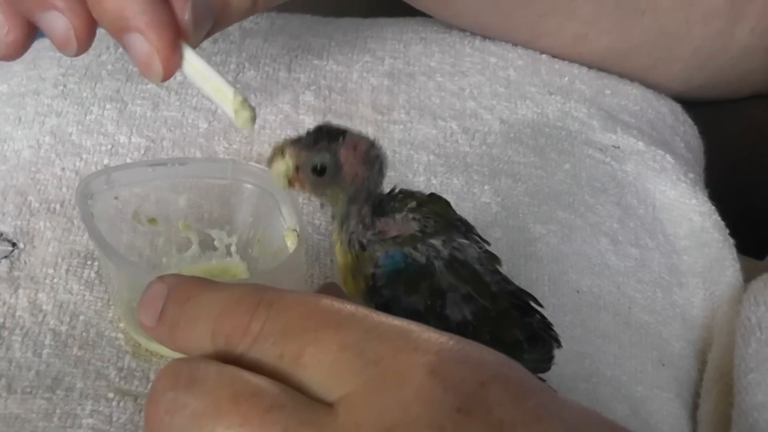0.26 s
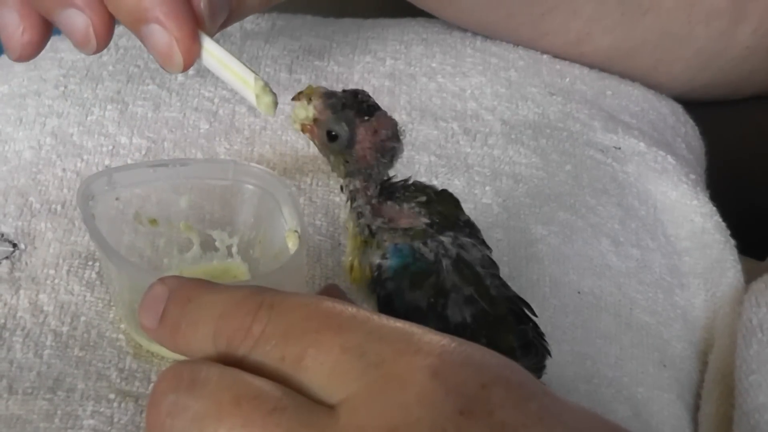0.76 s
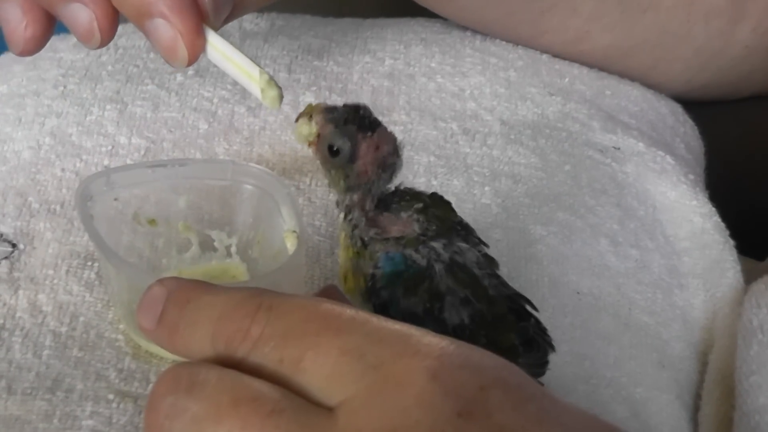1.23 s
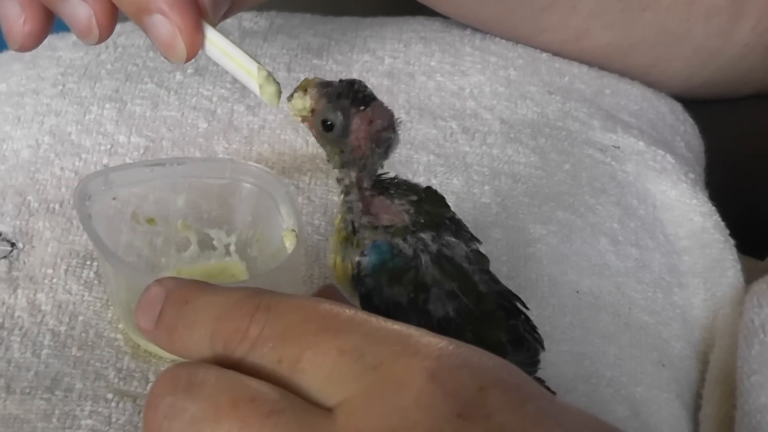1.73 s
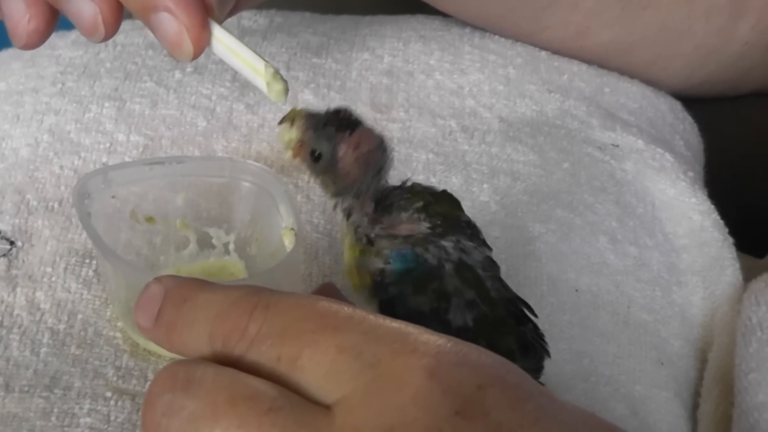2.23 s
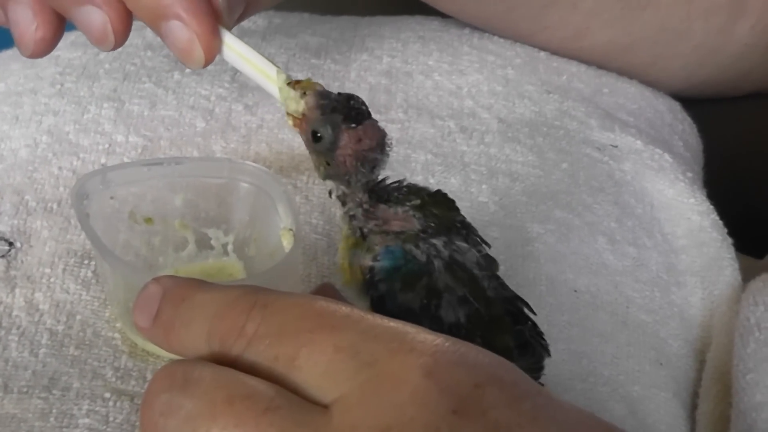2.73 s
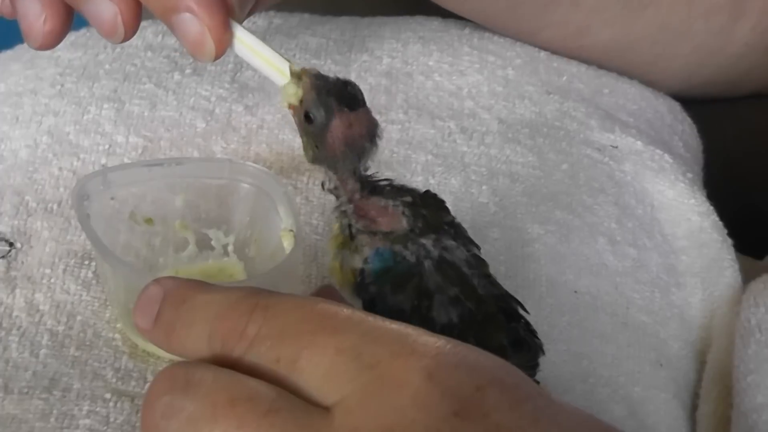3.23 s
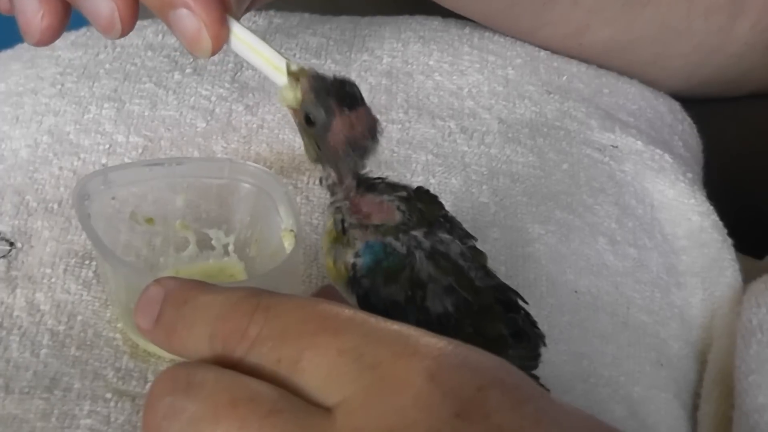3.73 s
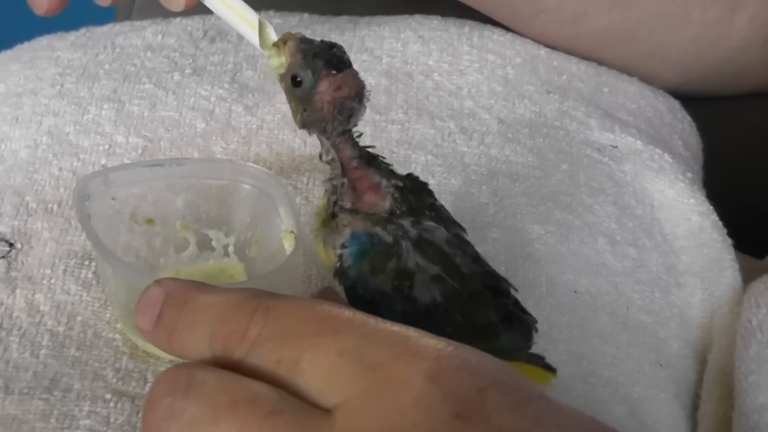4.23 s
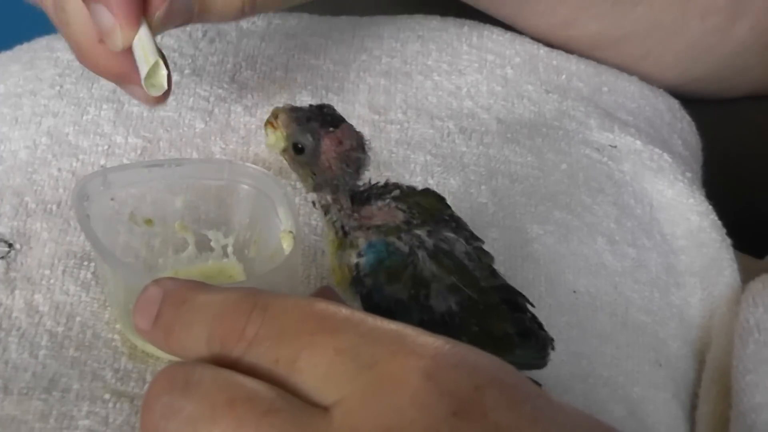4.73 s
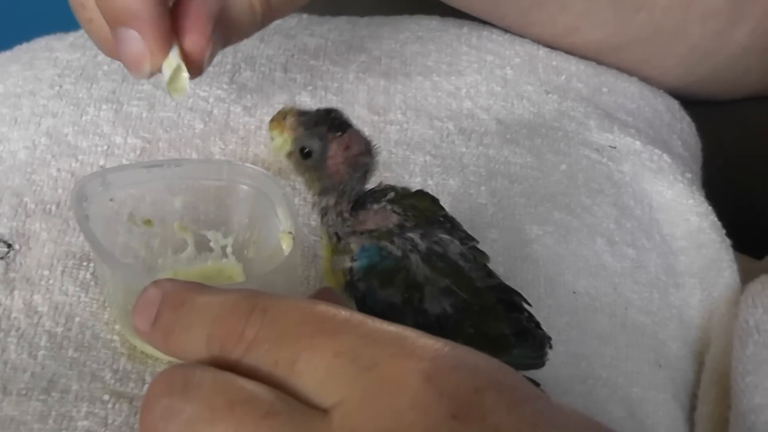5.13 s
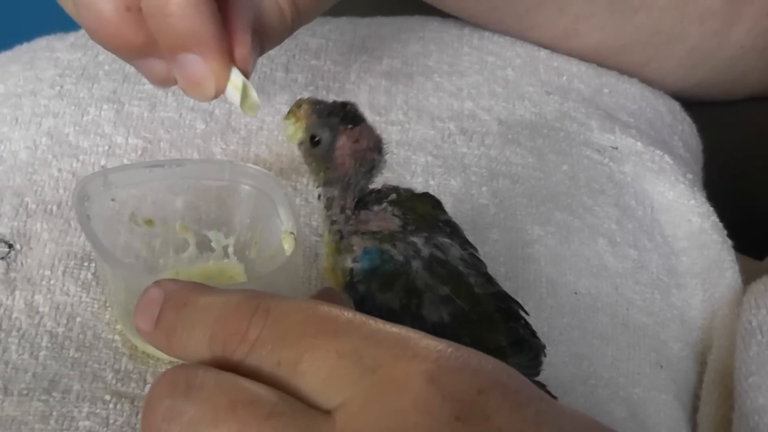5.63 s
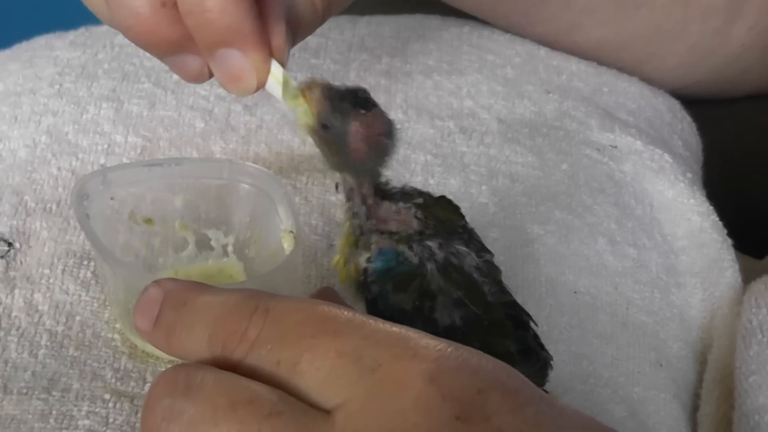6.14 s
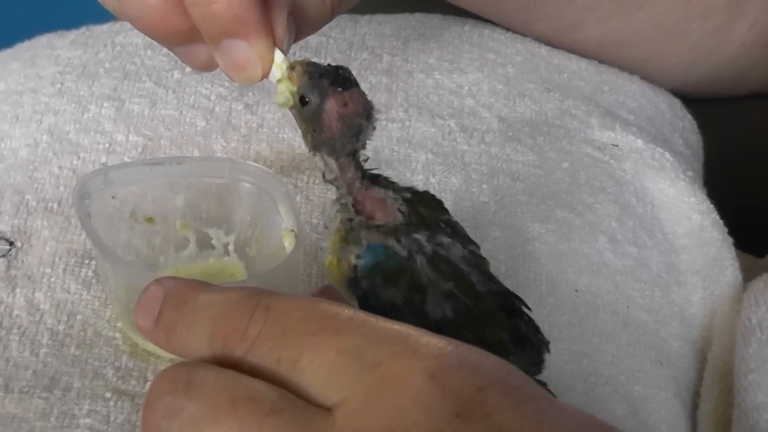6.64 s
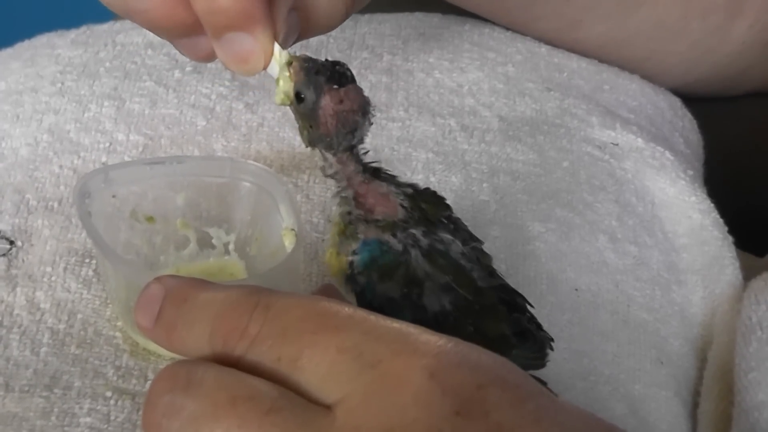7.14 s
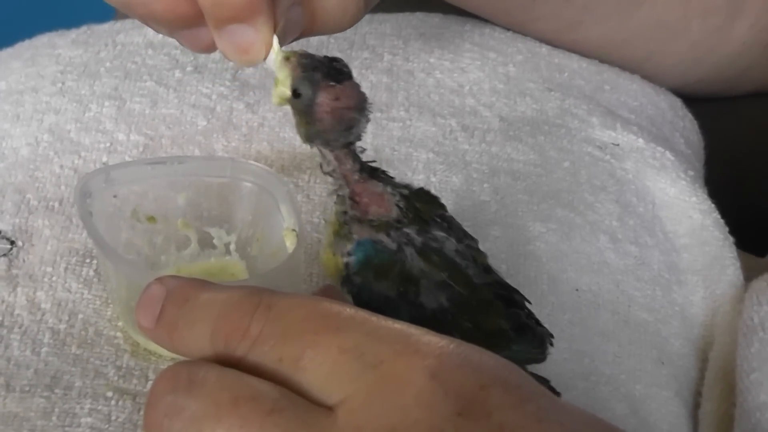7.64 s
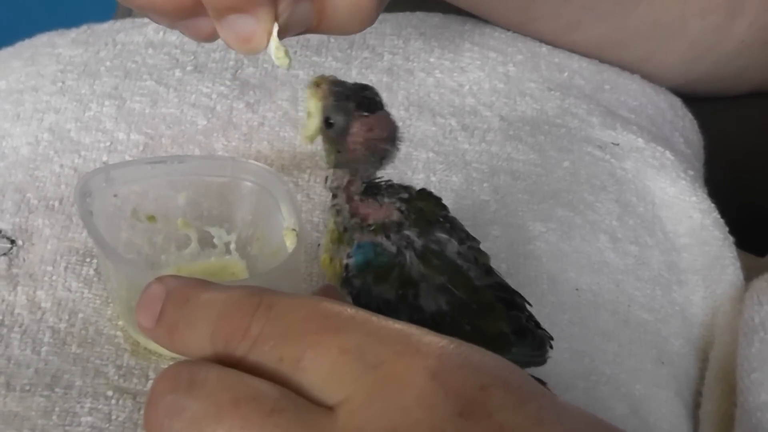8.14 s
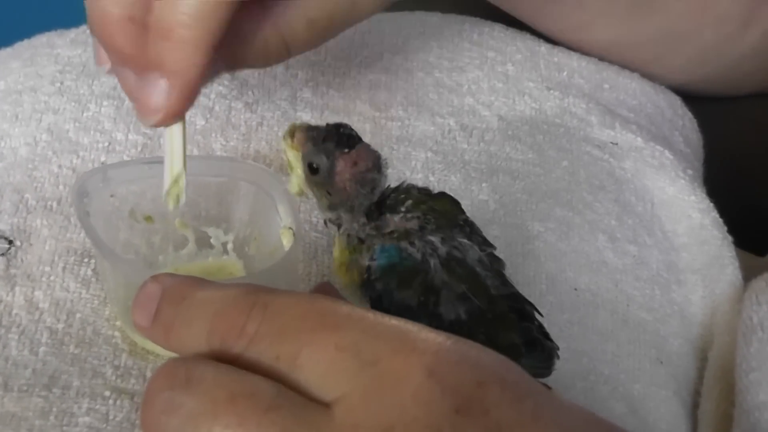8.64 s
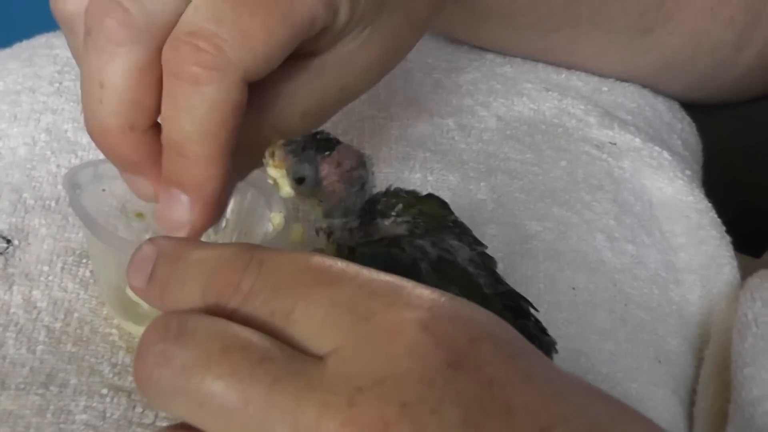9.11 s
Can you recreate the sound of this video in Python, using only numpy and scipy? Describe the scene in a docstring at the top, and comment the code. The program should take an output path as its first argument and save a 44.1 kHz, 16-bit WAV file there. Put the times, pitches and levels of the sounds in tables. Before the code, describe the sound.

A baby parrot gives short, sharp, high begging chirps in runs with pauses, close by in a small room.

```python
"""Far traffic hums outside; then, close by, a parrot chick begs while it is fed from a plastic spoon.
Each chirp starts with a rasp from slack membranes in its voice box, then whistles up to a crest,
dips and climbs again, and the small hard-walled room rings on.
Beak and spoon tick softly, and near the end comes a soft, grainy, breath-like hiss."""
import sys
import numpy as np
from scipy import signal
from scipy.fft import rfft, irfft, next_fast_len
from scipy.io import wavfile
from scipy.ndimage import uniform_filter1d

SR = 44100
rng = np.random.default_rng(int(sys.argv[2]) if len(sys.argv) > 2 else 0)


def put_to_file(sound):
    """Save the sound as 16-bit audio at rate SR, in the file named by the first command-line argument."""
    columns = np.atleast_2d(sound).T  # one column per channel
    safe = np.clip(columns, -1, 1)
    whole_steps = np.round(safe * 32767)
    wavfile.write(sys.argv[1], SR, whole_steps.astype(np.int16))


N = 413216
TIME = np.arange(N) / SR


def from_db(db):
    """Turn decibels into a number to multiply by."""
    return 10 ** (np.asarray(db) / 20)


def rms_one(x):
    """Scale a signal so its average strength (rms) is 1."""
    return x / np.sqrt(np.mean(x ** 2) + 1e-20)


def at_hz(points, size=N):
    """Join rows of (Hz, value) into a curve over all frequencies."""
    hz, value = np.transpose(points)
    return np.interp(np.log(np.fft.rfftfreq(size, 1 / SR) + 1), np.log(hz), value)


def noise(colour):
    """Noise of strength 1; its colour says how strong each frequency is."""
    return rms_one(irfft(rfft(rng.standard_normal(N)) * from_db(at_hz(colour)), N))


def drift(rate_hz):
    """A random wander of strength 1, mostly slower than the given rate."""
    hz = np.fft.rfftfreq(N, 1 / SR)
    return rms_one(irfft(rfft(rng.standard_normal(N)) / (1 + (hz / rate_hz) ** 2), N))


def hump(t, width_s):
    """A smooth swell: 1 at t = 0, about a third one width either side."""
    return np.exp(-(t / width_s) ** 2)


# Each row: frequency in Hz, relative level of the background noise in dB.
AIR_COLOUR = [(18, -40.5), (30, -17), (90, -10), (160, -7), (243, -6.5), (389, -12), (673, -10), (728, -10),
              (830, -11.5), (1680, -15.5), (2690, -28.5), (3980, -26.5), (4660, -28.5), (6720, -35),
              (15500, -50)]
# Each row: frequency in Hz, how alike left and right are (1 means the same).
AIR_LIKENESS = [(40, 0.66), (90, 0.29), (180, 0.24), (350, 0.28), (700, 0.67), (1400, 0.093), (3000, 0.85),
                (12000, 0.89)]
# Each row: frequency in Hz, how much louder the left is than the right in dB.
AIR_LEFT_DB = [(40, -5), (180, -1.1), (700, -1.5), (1400, 0), (12000, 0.5)]
# Each row: time in seconds, traffic level in dB (only its rise and fall count).
TRAFFIC_SWELL = [(0.0, -54), (1.72, -56), (2.11, -53.5), (2.66, -58), (3.91, -57.5), (4.46, -59.5),
                 (5.51, -57.5), (6.5, -57.5), (7.12, -53), (8.61, -58), (8.9, -55), (9.37, -57.5)]

def traffic(level_db=-51.5, rumble_follow=.45):
    """Traffic through the walls: rumble and tyre wash swell over a steady hiss."""
    swell_db = np.interp(TIME, *np.transpose(TRAFFIC_SWELL))
    swell_db -= swell_db.mean()
    alike = at_hz(AIR_LIKENESS)
    mid, side = rfft(rng.standard_normal((2, N)))
    sides = np.array([[1], [-1]])   # left, right
    air = np.sqrt(1 + alike) * mid + sides * np.sqrt(1 - alike) * side
    air *= from_db(at_hz(AIR_COLOUR) + sides * at_hz(AIR_LEFT_DB) / 2)
    low, high = at_hz([(300, 1), (500, 0)]), at_hz([(1200, 0), (4000, 1)])
    rumble, wash, hiss = (irfft(air * share, N) for share in (low, 1 - low - high, high))
    swelling = rumble * from_db(rumble_follow * swell_db) + wash * from_db(swell_db) + hiss
    return from_db(level_db) * swelling / np.std(rumble + wash + hiss)


# An idling engine slows a little. Each row: time in seconds, firings per second.
IDLE_SPEED = [(0, 47.83), (6.6, 47.1), (9.37, 45.35)]
# Levels in dB of its tones at one, two and three times the firing rate.
IDLE_TONES_DB = [-69.5, -66, -71.5]
# A steady hum. Each row: pitch in Hz, level in dB.
HUM_TONES = [(187, -67), (235, -65.5)]
# Low drones. Each row: time of the peak in seconds, width in seconds, pitch in Hz, level in dB.
DRONE_SWELLS = [(2.68, 0.66, 58.2, -54.5), (4.45, 0.61, 55.9, -61), (5.458, .75, 139.3, -61),
                (8.104, 0.37, 86.55, -54.5), (8.901, .8, 45.4, -60.5), (9.3, .25, 89, -60)]

def engines(waver=.012, flutter_db=2.0):
    """Low wavering tones of far motors: one idles, one hums, others swell and fade."""
    def tone(hz, level_db):
        gain = from_db(level_db + flutter_db * drift(4.3))
        phase = 2 * np.pi * np.cumsum(hz * (1 + waver * drift(6))) / SR
        return gain * np.sqrt(2) * np.sin(phase)
    firing_hz = np.interp(TIME, *np.transpose(IDLE_SPEED))
    idle = sum(tone(k * firing_hz, db) for k, db in enumerate(IDLE_TONES_DB, 1))
    hum = sum(tone(hz, db) for hz, db in HUM_TONES)
    drones = sum(tone(hz, db) * hump(TIME - at, width_s) for at, width_s, hz, db in DRONE_SWELLS)
    return (idle + hum + drones) * from_db([[-1.5], [1.2]])   # louder on the right


LOWEST_HZ, RASP_HZ, DIP_HZ, SECOND_CREST_HZ = 4082, 4640, 5268, 5950

def chirp_pitch(t, rise_s, second_s, crest_hz, curve=1.8, drop_s=.0155, upturn_s=.022):
    """The pitch climbs to the crest at t = 0, dips, and turns up once more."""
    climb = crest_hz - (crest_hz - RASP_HZ) * np.abs(t / rise_s) ** curve
    drop = (crest_hz - DIP_HZ) * hump(t, drop_s)
    upturn = (SECOND_CREST_HZ - DIP_HZ) * hump(t - second_s, upturn_s)
    return np.where(t < 0, np.maximum(climb, LOWEST_HZ), DIP_HZ + drop + upturn)


def voicing_db(t, on_s, off_s, attack_db_per_s=1004.5, release_db_per_s=802.5):
    """The voice fades in, holds from on_s to off_s, then fades out."""
    return -attack_db_per_s * np.maximum(on_s - t, 0) - release_db_per_s * np.maximum(t - off_s, 0)


def rasp_shape(t, hold_s=.005, build_db_per_s=754, fade_db_per_s=950.5, creak_hz=248, depth=.6):
    """Creaky pulses build up to the rasp, which holds around t = 0 and dies away."""
    before = np.maximum(-t - hold_s, 0)
    creak = 1 + depth * np.sin(2 * np.pi * creak_hz * before)
    return creak * from_db(voicing_db(t, -hold_s, hold_s, build_db_per_s, fade_db_per_s))


# Each row: frequency in Hz, relative level of the rasp in dB.
RASP_COLOUR = [(700, -34), (1200, -15), (1700, -6.5), (2280, -20.5), (3100, -13), (3650, -15), (4600, -15),
               (5500, -10.5), (6850, 2.5), (8100, -7), (9300, -14), (12400, -20.5), (15500, -33)]

def rasp(crackle_db=5.0):
    """Slack membranes rattle, making a crackly noise."""
    return noise(RASP_COLOUR) * rms_one(from_db(crackle_db * drift(450)))


# Each row: frequency in Hz, relative level of the breath in dB.
BREATH_COLOUR = [(1500, -21), (2900, -13), (3600, -13.5), (4700, -7), (6600, 8), (7300, 2), (8000, 1.5),
                 (9100, -3), (10000, -1.5), (12000, -3), (13300, -27.5), (15500, -23.5)]

def husky_edge(phase, breath_db=-1.5, flutter_db=9):
    """Strained membranes add breathy, unsteady tones at 0.5 and 1.5 times the pitch."""
    half_phase = phase / 2 + 1.3 * drift(240)
    half_tones = np.sin(phase + half_phase) + 0.27 * np.sin(half_phase)
    patches = rms_one(from_db(flutter_db * np.tanh(drift(60) - .5)))   # catches and lets go
    return (from_db(breath_db) * noise(BREATH_COLOUR) + half_tones) * patches


# Each row: time of the crest in seconds; seconds from rasp to crest, from first push of air to crest
# and from crest to second crest; crest pitch in Hz; whistle level in dB in the dip, at the crest and
# at the second crest; level in dB of the octave (a tone at twice the pitch) and of the rasp.
CHIRP_NOTES = [ (0.481, 0.042, 0.021, 0.066, 6093, -30.5, -20.5, -28.5, -37, -38.5),
               (0.798, 0.037, 0.012, 0.094, 6100, -29.5, -22, -25.5, -36.5, -39.5),
               (1.713, .042, .015, 0.093, 6060, -25.5, -11.5, -19, -36, -35),
               (2.014, 0.048, 0.025, 0.1, 6110, -26.5, -19, -21.5, -33.5, -34.5),
               (2.333, 0.046, 0.023, 0.091, 6170, -27.5, -21.5, -20, -38.5, -34.5),
               (2.671, 0.036, 0.017, 0.098, 6100, -29, -19.5, -20.5, -36, -36.5),
               (2.963, 0.046, 0.011, .089, 6225, -28.5, -15, -24.5, -49, -37),
               (3.314, 0.042, 0.013, 0.085, 6205, -29.5, -20.5, -28, -53.5, -43.5),
               (4.274, .036, 0.01, .083, 6150, -28, -13, -20.5, -52.5, -51),
               (5.68, 0.041, .027, 0.079, 6226, -23.5, -16, -17, -39.5, -37.5),
               (6.006, 0.045, 0.022, 0.092, 6034, -27.5, -12, -28.5, -37.5, -35),
               (6.316, .044, 0.015, .095, 6174, -25.5, -11, -20, -46, -39.5),
               (6.642, 0.048, 0.013, 0.08, 6175, -31, -30, -46.5, -47.5, -43),
               (8.470, 0.034, 0.016, 0.061, 6170, -25.5, -10.5, -42, -54, -35.5)]

def chirps(climb_db=-30.5, loss_db_per_khz=5.5, octave_fade_db_per_s=90, lead_in_db=-55, creak_s=.023):
    """Pitch and strengths of the voice: each chirp is a creak, then a note with two pushes of air."""
    pitch, gains = np.full(N, float(DIP_HZ)), np.zeros((4, N))
    for at, rise_s, push_s, second_s, crest_hz, *levels in CHIRP_NOTES:
        dip_db, crest_db, second_db, octave_db, rasp_db = levels
        i = np.arange(int((at - .1) * SR), int((at + .15) * SR))
        t = i / SR - at
        since_rasp = t + rise_s
        begun = since_rasp > -creak_s
        pitch[i] = chirp_pitch(t, rise_s, second_s, crest_hz)
        # the first push comes abruptly and ebbs just after the crest
        push = (np.tanh((t + push_s) / .0035) - np.tanh((t - .0084) / .0057)) / 2
        second_push = hump(t - second_s + .011, .013)   # peaks just before the pitch does
        relaxed = 1 - push - second_push
        below_dip_khz = np.maximum(DIP_HZ - pitch[i], 0) / 1000
        relaxed_db = np.where(t < 0, climb_db - loss_db_per_khz * below_dip_khz, dip_db)
        whistle_db = relaxed * relaxed_db + push * crest_db + second_push * second_db
        whistle = from_db(whistle_db + voicing_db(t, .009 - rise_s, second_s))
        whistle += from_db(lead_in_db) * hump(since_rasp, .018) * begun   # a thin opening squeak
        octave_db -= octave_fade_db_per_s * np.maximum(t, 0)
        octave = from_db(octave_db + voicing_db(t, .011 - rise_s, second_s - .021))
        rattle = from_db(rasp_db) * rasp_shape(since_rasp) * begun
        # huskiness sits 10 dB under the rasp, flares as the voice catches, eases between pushes
        flare_db, ease_db = 11 * hump(since_rasp - .003, .002), 10 * relaxed * (t > 0)
        husk = from_db(rasp_db - 10 + flare_db - ease_db + voicing_db(t, -rise_s, second_s - .018))
        gains[:, i] += [whistle, octave, rattle, husk]
    return pitch, *gains


def chick(wobble=.003, jitter=.0021, slack_jitter=.088, lock_db=-41, shimmer_db=2.1, octave_shimmer_db=3):
    """The voice box whistles, with an octave above, a rasp and a husky edge."""
    pitch, whistle, octave, rattle, husk = chirps()
    slack = 1 / (1 + whistle / from_db(lock_db))   # the pitch is shaky until driven hard enough
    waver = wobble * drift(60) + (jitter + slack_jitter * slack ** 2) * drift(300)
    phase = 2 * np.pi * np.cumsum(pitch * (1 + waver)) / SR
    tone = whistle * from_db(shimmer_db * drift(120)) * np.sqrt(2) * np.sin(phase)
    overtone = octave * from_db(octave_shimmer_db * drift(150)) * np.sqrt(2) * np.sin(2 * phase)
    return tone + overtone + rattle * rasp() + husk * husky_edge(phase)


def room(x, ring_s=.45, tail_db=-10.0, early_db=-12.5, early_s=.012, width=.16):
    """Hard walls send back quick echoes, then a dense tail, almost the same left and right."""
    t = np.arange(int(.7 * SR)) / SR
    tail = from_db(-60 * t / ring_s) * np.clip((t - .005) / .0077, 0, 1)
    early = np.exp(-t / early_s) * (t > .002)
    envelope = np.hypot(from_db(tail_db) * tail / np.linalg.norm(tail),
                        from_db(early_db) * early / np.linalg.norm(early))
    mid, side = rng.standard_normal((2, len(t))) * envelope
    # The treble is beamed and absorbed. Each row: frequency in Hz, echo boost or cut in dB.
    walls = [(1500, -14), (4000, 4.5), (6200, 0.0), (8000, -7), (11000, -11), (15000, -19)]
    size = next_fast_len(N + len(t))
    response = rfft([mid + width * side, mid - width * side], size) * from_db(at_hz(walls, size))
    return irfft(rfft(x, size) * response, size)[:, :N]


# Each row: start in seconds, level in dB before the boost, seconds to fade by 40 dB.
TICK_BURSTS = [(0.7393, -48, 0.0035), (1.297, -55.5, 0.0045), (1.539, -65, .005), (4.6516, -53, 0.0092),
               (4.658, -53.5, 0.021), (7.5937, -56, 0.0044), (8.3042, -60.5, 0.011), (8.4072, -42, 0.0084),
               (9.093, -53.5, 0.015)]
# Each row: frequency in Hz, relative level of the ticks in dB.
TICK_NOISE = [(900, -20), (2000, -5.5), (4000, 2.5), (7000, 1), (10000, -4.5), (15500, -23.5)]

def ticks(boost_db=6.0):
    """Wet beak snaps and spoon touches: tiny bursts that die at once."""
    envelope = np.zeros(N)
    for at, level_db, ring_s in TICK_BURSTS:
        i = slice(int(at * SR), int(at * SR) + SR // 10)
        age = TIME[i] - TIME[i][0]
        envelope[i] += from_db(level_db + boost_db - 40 * age / ring_s)
    return envelope * noise(TICK_NOISE)


# Each row: time of the peak in seconds, width in seconds, level in dB.
HISS_SWELLS = [(8.887, 0.018, -57), (9.113, 0.12, -53.5)]
# Each row: frequency in Hz, relative level of the hiss in dB.
HISS_COLOUR = [(900, -17), (2000, 3), (3000, -9), (4300, 7), (6500, 4.5), (8200, -7.5), (10500, -14),
               (15500, -27)]

def soft_hiss(grain_db=3.0):
    """A soft, grainy, breath-like hiss swells twice near the end."""
    envelope = sum(from_db(db) * hump(TIME - at, width_s) for at, width_s, db in HISS_SWELLS)
    return envelope * noise(HISS_COLOUR) * rms_one(from_db(grain_db * drift(200)))


def microphones(x, right_lead_samples=0.12, pan_db=1.0):
    """The chick sits just right of centre, so that side hears it a little earlier and louder."""
    phase_lead = 2 * np.pi * np.fft.rfftfreq(N) * right_lead_samples
    sides = np.array([[-.5], [.5]])
    return irfft(rfft(x) * np.exp(1j * sides * phase_lead), N) * from_db(sides * pan_db)


def scene():
    """Chick, ticks and soft hiss in the room, over the far traffic."""
    close = chick() + ticks() + soft_hiss()
    return microphones(close + room(close)) + traffic() + engines()


def record(dry, ceiling_db=-8.0, release_db_per_s=36.5, low_cut_hz=38.0, high_cut_hz=15600):
    """Cut the deepest bass and highest treble; a limiter turns loud crests down and lets go slowly."""
    heard = signal.sosfilt(signal.butter(6, low_cut_hz, "high", fs=SR, output="sos"), dry)
    over_db = np.maximum(20 * np.log10(np.abs(heard).max(axis=0) + 1e-9) - ceiling_db, 0)
    release_db = release_db_per_s * TIME
    cut_db = uniform_filter1d(np.maximum.accumulate(over_db + release_db) - release_db, size=64)
    treble_cut = signal.ellip(10, .1, 80, high_cut_hz, fs=SR, output="sos")
    return signal.sosfilt(treble_cut, heard * from_db(-cut_db))


dry = scene()
out = record(dry)
put_to_file(out)
```